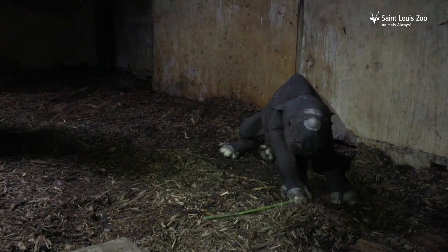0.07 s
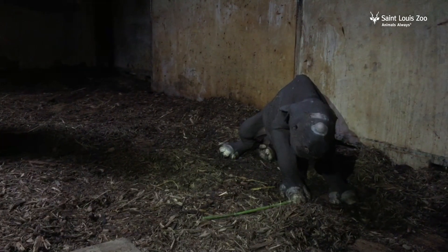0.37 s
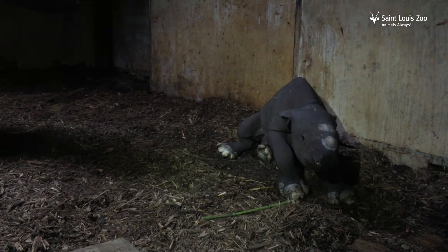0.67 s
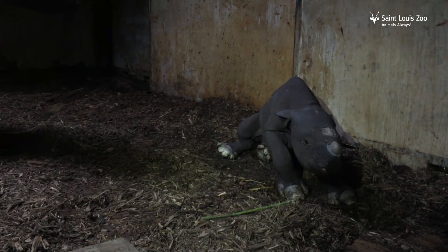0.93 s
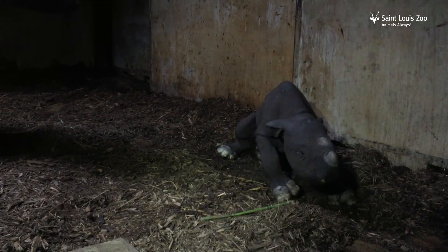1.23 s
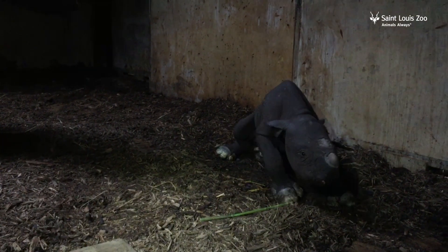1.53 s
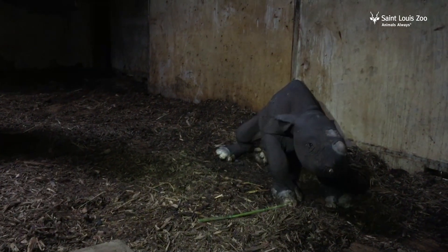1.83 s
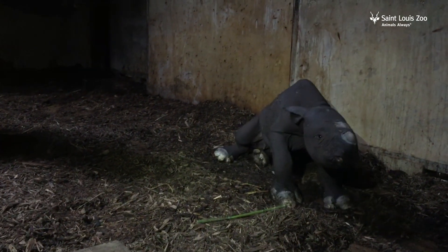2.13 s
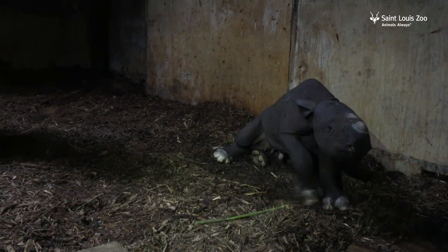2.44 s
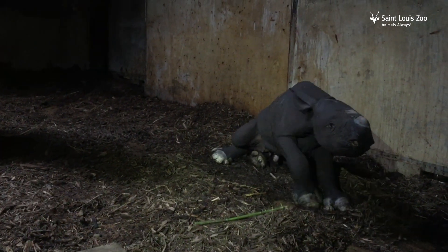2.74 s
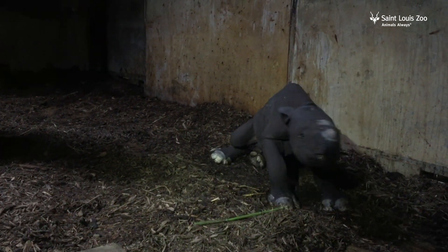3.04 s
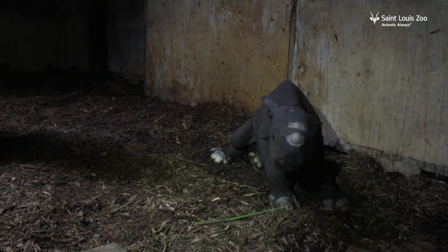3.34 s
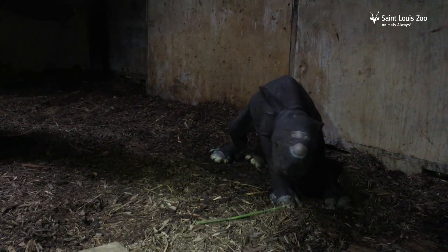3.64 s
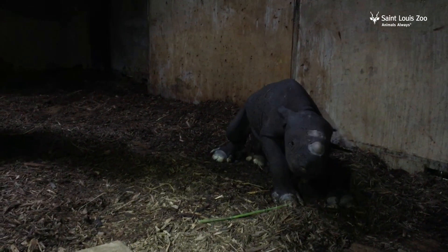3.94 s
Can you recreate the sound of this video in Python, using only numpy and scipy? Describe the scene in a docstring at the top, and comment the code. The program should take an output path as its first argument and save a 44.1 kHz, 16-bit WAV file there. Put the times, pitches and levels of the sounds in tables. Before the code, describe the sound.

A steady ventilation rumble runs in a hard-walled enclosure, with occasional distant, echoing bird chirps. Closer to the microphone, straw rustles and snaps softly under a rhino calf's feet, with a few dull knocks and a thin squeak late on.

```python
"""Ventilation rumble cuts in abruptly, with a distant chirp and the rustle of straw in a concrete stall.
A rhino calf shifts its feet: stalks rub, click and snap. Brief low swells and dull knocks come and go.
A small bird, probably a sparrow, chirps far off in the building; reverberation between the hard walls
smears each chirp into a breathy puff. Near the end comes one thin squeak."""
import sys
import numpy as np
from scipy import signal
from scipy.fft import rfft, irfft
from scipy.io import wavfile

SR = 44100
rng = np.random.default_rng(int(sys.argv[2]) if len(sys.argv) > 2 else 0)


def unload_audio(sound):
    """Save the sound as a 16-bit wav file, at the path given as the first command line argument."""
    columns = np.transpose(np.atleast_2d(sound))
    # keep every value between -1 and 1, then stretch to whole-number steps
    steps = np.round(np.clip(columns, -1, 1) * 32767)
    wavfile.write(sys.argv[1], SR, steps.astype(np.int16))


N = 176400
TIME = np.arange(N) / SR
BIN_HZ = np.arange(N // 2 + 1) * SR / N


def from_db(db):
    """Amplitude ratio of a level: a factor of ten for every 20 dB."""
    return 10 ** (np.asarray(db) / 20)


def rms_one(x):
    """Normalisation to unit mean power."""
    return x / np.sqrt(np.mean(x ** 2) + 1e-20)


def bump(peak_s, width_s):
    """Gaussian envelope: a smooth swell and fade."""
    return np.exp(-((TIME - peak_s) / width_s) ** 2 / 2)


def colour(noise, spectrum):
    """Spectral shaping of noise by (frequency [Hz], relative level [dB]); rms 1."""
    hz, db = np.transpose(spectrum)
    gain = from_db(np.interp(np.log(np.maximum(BIN_HZ, 1)), np.log(hz), db))
    return rms_one(irfft(rfft(noise) * gain, N))


def narrow_noise(hz, width_hz):
    """Resonance driven by white noise (a random wander when centred on 0 Hz); rms 1."""
    return rms_one(irfft(rfft(rng.standard_normal(N)) / (1 + ((BIN_HZ - hz) / width_hz) ** 2), N))


def reverberation(direct, wet):
    """Reflections off hard walls build a diffuse field that decays exponentially, the treble sooner."""
    low_t60_s, treble_t60_s, build_s, crossover_hz = 1.12, 1, 0.008, 4700
    t = TIME[:int(1.5 * SR)]
    noise = rng.standard_normal(len(t))
    low = signal.sosfiltfilt(signal.butter(4, crossover_hz, fs=SR, output="sos"), noise)
    tail = low * from_db(-60 * t / low_t60_s) + (noise - low) * from_db(-60 * t / treble_t60_s)
    tail *= 1 - np.exp(-t / build_s)
    diffuse = signal.fftconvolve(direct, tail / np.linalg.norm(tail))[:N]
    return np.sqrt(1 - wet) * direct + np.sqrt(wet) * diffuse


def whistle(contour, jitter, trill=0, start=0, pitch=1, stretch=1):
    """Frequency modulation: a gliding tone with a weak octave, a periodic trill and random jitter."""
    trill_hz, octave_db, edge_s = 170, -34.5, .004
    times, hz, db = np.transpose(contour)
    times = start + stretch * times
    gate = np.clip(np.minimum(TIME - times[0], times[-1] - TIME) / edge_s, 0, 1)
    waver = 1 + trill * np.sin(2 * np.pi * trill_hz * TIME) + jitter * narrow_noise(0, width_hz=349)
    phase = 2 * np.pi * np.cumsum(pitch * np.interp(TIME, times, hz) * waver) / SR
    tone = np.sin(phase) + from_db(octave_db) * np.sin(2 * phase)
    return np.sqrt(2) * gate * from_db(np.interp(TIME, times, db)) * tone


def ventilation():
    """Broadband flow noise with duct resonances; its bands flutter independently and its rumble swells."""
    # spectrum of the rushing air: (frequency [Hz], relative level [dB])
    air_spectrum = [(15, -74), (35, -37), (48, -3), (62, -3.5), (100, -3), (130, -9.5), (230, -19),
                    (300, -22.5), (490, -30.5), (650, -24.5), (900, -24.5), (1150, -27), (1350, -32),
                    (1800, -35), (3000, -45), (9300, -53), (10400, -55.5), (15500, -55.5)]
    # duct resonances: (frequency [Hz], width [Hz], level at mid-scene [dB], growth [dB/s])
    resonances = [(70, 12.2, -45.5, -0.5), (1040, 157, -71, 2)]
    # swell of the rumble: (time [s], gain [dB])
    rumble_swell = [(.14, -1), (1.17, 2), (1.33, -2.5), (1.52, 6), (1.72, -6.5), (2.13, -2.5), (3.13, -1.5),
                    (3.3, 2), (3.7, 2.5), (4, -3.5)]
    flutter_db, flutter_hz, growth_db_per_s, rumble_top_hz = 3, 28.095, .5, 100.58
    from_middle_s = TIME - TIME.mean()
    air = from_db(-44.5) * colour(rng.standard_normal(N), air_spectrum)
    spectrum = rfft(air)
    edges_hz = np.geomspace(100, 2500, num=15)
    for low, high in zip(edges_hz, edges_hz[1:]):
        band = irfft(spectrum * ((BIN_HZ >= low) & (BIN_HZ < high)), N)
        band_db = flutter_db * narrow_noise(0, flutter_hz) + growth_db_per_s * from_middle_s
        air += (rms_one(from_db(band_db)) - 1) * band
    for hz, width_hz, db, growth in resonances:
        air += from_db(db + growth * from_middle_s) * narrow_noise(hz, width_hz)
    rumble = signal.sosfiltfilt(signal.butter(4, rumble_top_hz, fs=SR, output="sos"), air)
    swell = from_db(np.interp(TIME, *np.transpose(rumble_swell)))
    return air + (swell - 1) * rumble


def duct_tone():
    """Airflow excites one narrow duct resonance, heard as a faint, wavering tone."""
    # envelope of the tone: (time [s], level [dB])
    envelope = [(0.14, -62.5), (1.3, -69), (1.5, -64), (1.7, -62), (2.85, -63), (3.3, -61.5), (3.45, -52.5),
                (3.55, -63.5), (3.7, -59.5), (4.0, -68)]
    return from_db(np.interp(TIME, *np.transpose(envelope))) * narrow_noise(hz=756.3, width_hz=16.2)


def swells_and_knocks():
    """Amplitude modulation of two low noise bands: brief swells of the rumble and dull knocks."""
    # low swells and dull knocks: (time [s], width [s], swell level [dB], knock level [dB])
    pulses = [(0.6, 0.034, -49, -82), (2.003, 0.0098, -49, -50), (3.06, 0.07915, -52, -67),
              (3.214, 0.018, -52, -53.5), (3.678, 0.075, -45.5, -55.5), (3.99, .016, -57, -57)]
    swell = sum(from_db(db) * bump(time, width) for time, width, db, _ in pulses)
    knock = sum(from_db(db) * bump(time, width) for time, width, _, db in pulses)
    return swell * narrow_noise(hz=120, width_hz=34) + knock * narrow_noise(hz=263, width_hz=86)


def bird():
    """Two-voiced chirps from far off, where the reverberant field outweighs the direct sound."""
    # chirps: (start [s], level [dB], pitch [ratio], stretch [ratio], lead gain [dB], crest gain [dB])
    chirps = [(-0.015, -46.3, 1.005, 0.98, -15, 1), (0.345, -44.5, 1, 0.77, -25, -20),
              (2.172, -47.5, 0.99, 0.84, -19, -5.5), (3.637, -46.5, .99, .78, -18.5, -7.5)]
    # notes of a chirp, before scaling: (time [s], frequency [Hz], relative level [dB])
    upper_voice = [(0, 4220, -5), (.014, 4800, 4.5), (.035, 4730, -4), (.06, 4660, -7), (.088, 4833, -3.5),
                   (.102, 4386, 6), (.145, 3812, -2.5), (.18, 3530, -32)]
    lower_voice = [(0, 3800, -5.5), (.025, 3992, -3), (.05, 3829, -3), (.07, 3250, 0), (.095, 3857, -3.5),
                   (.13, 3760, 0.5), (.17, 3158, -1)]
    crest_note = [(.014, 4960, -31), (.024, 5210, 2.5), (.04, 5173, 3.5), (.055, 5200, -30)]
    lead_note = [(0, 6500, -2), (.015, 6400, 1), (.04, 6176, 5), (.07, 5700, -6)]
    # a faint, higher answer: (time [s], frequency [Hz], level [dB])
    answer = [(2.48, 5214, -60), (2.53, 5510, -58.5), (2.58, 5338, -81), (2.63, 5910, -81),
              (2.66, 5570, -70.5)]
    clear, rough, roughest, trill = .024, .048, .055, .022   # fractional frequency deviations
    lead_s = 0.029
    song = whistle(answer, roughest, trill)
    for start, db, pitch, stretch, lead_db, crest_db in chirps:
        upper = whistle(upper_voice, clear, trill, start, pitch, stretch)
        lower = whistle(lower_voice, rough, trill, start, pitch, stretch)
        crest = from_db(crest_db) * whistle(crest_note, clear, 0, start, pitch, stretch)
        lead = from_db(lead_db) * whistle(lead_note, roughest, 0, start - lead_s, pitch)
        song += from_db(db) * (upper + lower + crest + lead)
    return reverberation(song, wet=0.92)


def squeak():
    """Random modulation of pitch and level makes a thin tone hoarse; it rises, breaks and settles."""
    # glide of the squeak: (time [s], frequency [Hz], level [dB])
    glide = [(3.565, 1591, -62), (3.61, 1845, -59), (3.655, 2028, -50.5), (3.678, 2010, -66),
             (3.695, 1885, -48.5), (3.725, 1874, -49.5), (3.77, 1890, -59)]
    flutter = rms_one(from_db(3.5 * narrow_noise(0, width_hz=85)))
    return reverberation(flutter * whistle(glide, jitter=0.063), wet=0.33)


def straw_grain():
    """Shot noise of many tiny stalk clicks over smooth friction noise."""
    clicks_per_s, click_share = 3000, 0.69
    clicks = (rng.random(N) < clicks_per_s / SR) * rng.standard_normal(N)
    return np.sqrt(click_share) * rms_one(clicks) + np.sqrt(1 - click_share) * rng.standard_normal(N)


def straw():
    """Friction gives a bright hiss and a duller scuff; incoherent swishes and snaps add in power."""
    # swishes under the calf: (peak time [s], rise [s], fall [s], hiss level [dB], scuff level [dB])
    swishes = [(0.22, 0.33, 0.037, -74, -58.5), (0.345, 0.03, 0.085, -72.5, -61),
               (0.54, 0.064, 0.09556, -80, -59.5), (1.021, 0.13, 0.091, -69.5, -62),
               (1.18, 0.042, 0.028, -70, -58), (1.3, 0.082, 0.083, -71.5, -68.5),
               (1.5, 0.077, 0.064, -71.5, -63.5), (2.05, 0.04986, 0.1144, -75.5, -73),
               (2.55, 0.11, 0.057, -70.5, -65), (2.63, 0.031, 0.039, -78, -57.5),
               (3.072, 0.018, 0.02893, -59.5, -66), (3.1, .02, 0.032, -84, -55.5),
               (3.74, 0.12, 0.042, -68, -55.5), (3.86, 0.06, 0.093, -64.5, -52.5)]
    # breaking stalks: (time [s], level [dB])
    snaps = [(0.328, -52), (1.7261, -51.5), (3.8297, -56)]
    # friction spectra: (frequency [Hz], relative level [dB])
    hiss_spectrum = [(1500, -33), (3200, 6.5), (4500, 0.5), (6500, 4), (9000, 0.5), (12000, -5),
                     (15500, -17)]
    scuff_spectrum = [(300, 11.5), (700, -10), (1200, 5), (1900, 6), (2600, 1.5), (4000, -7.5), (8000, -30)]
    snap_decay_s = 0.004
    hiss_power, scuff_power = np.zeros((2, N))
    for time, rise, fall, hiss_db, scuff_db in swishes:
        swell = np.exp(-((TIME - time) / np.where(TIME < time, rise, fall)) ** 2)
        hiss_power += swell * from_db(hiss_db) ** 2
        scuff_power += swell * from_db(scuff_db) ** 2
    for time, db in snaps:
        decay = (TIME >= time) * np.exp(-2 * np.abs(TIME - time) / snap_decay_s)
        hiss_power += decay * from_db(db) ** 2 / 10   # starts 10 dB below the listed level
    # one stiff stalk rings as it is brushed
    ring = from_db(-61) * bump(peak_s=3.068, width_s=0.0099) * narrow_noise(hz=4250, width_hz=200)
    hiss = np.sqrt(hiss_power) * colour(straw_grain(), hiss_spectrum)
    scuff = np.sqrt(scuff_power) * colour(straw_grain(), scuff_spectrum)
    return reverberation(hiss + scuff + ring, wet=0.16)


def scene():
    """Superposition of all the sources at one point."""
    return (ventilation() + duct_tone() + bird() + squeak() + straw() + swells_and_knocks())[None]


def record(dry):
    """Gating and band limiting: the sound cuts in abruptly, and a steep low-pass removes the top."""
    cut_in_s, ramp_s, muted_db, stopband_hz = .136, .003, -64, 16200
    gate = np.clip((TIME - cut_in_s) / ramp_s, from_db(muted_db), 1)
    return signal.sosfilt(signal.cheby2(16, 60, stopband_hz, fs=SR, output="sos"), dry * gate)


dry = scene()
out = record(dry)
unload_audio(out)
```